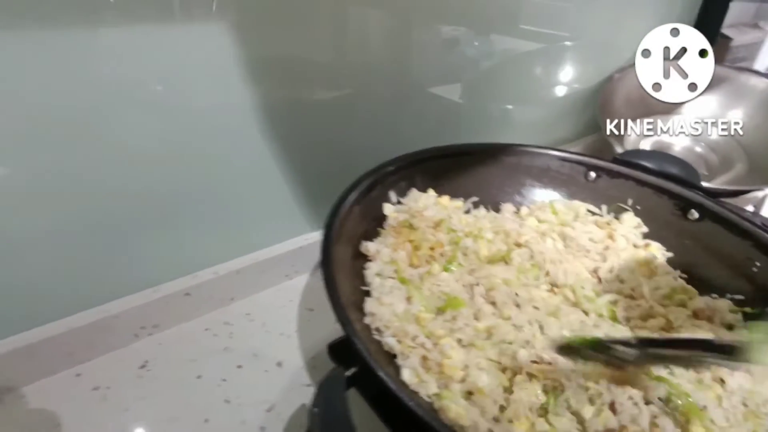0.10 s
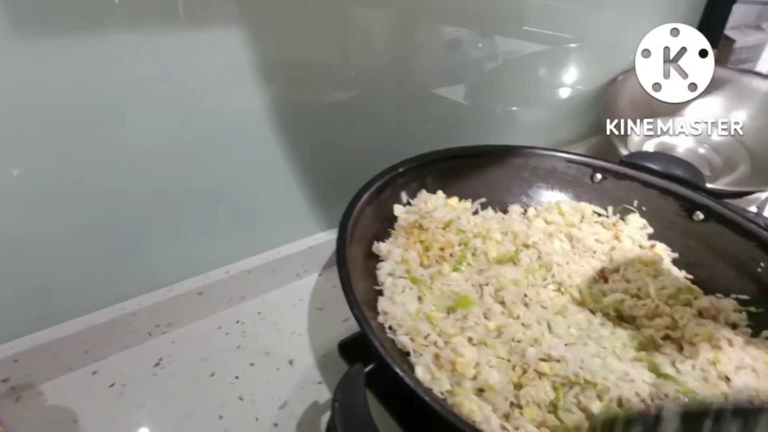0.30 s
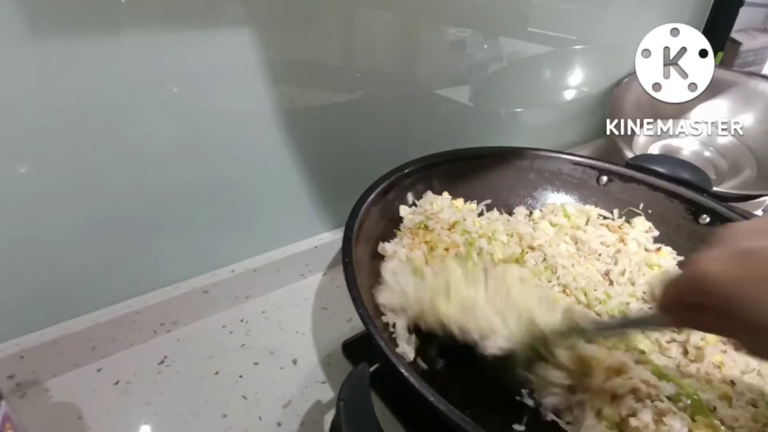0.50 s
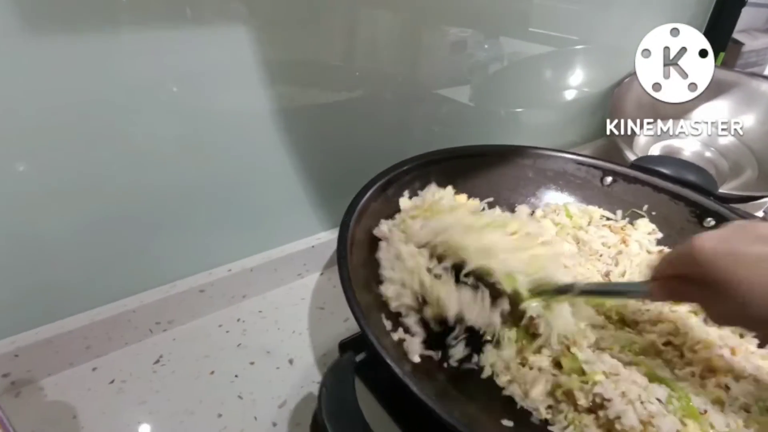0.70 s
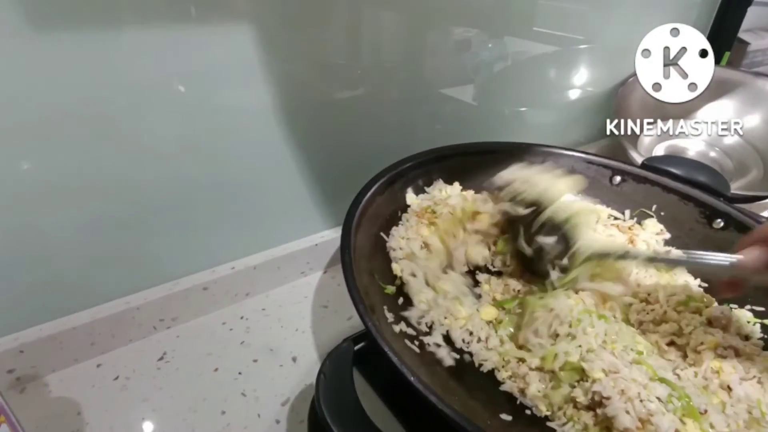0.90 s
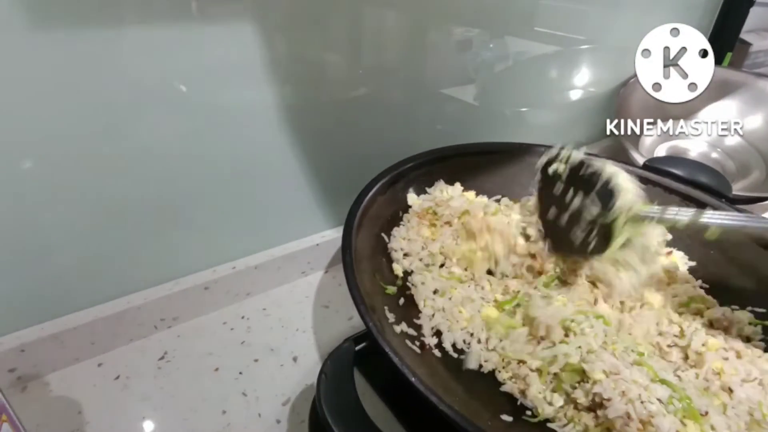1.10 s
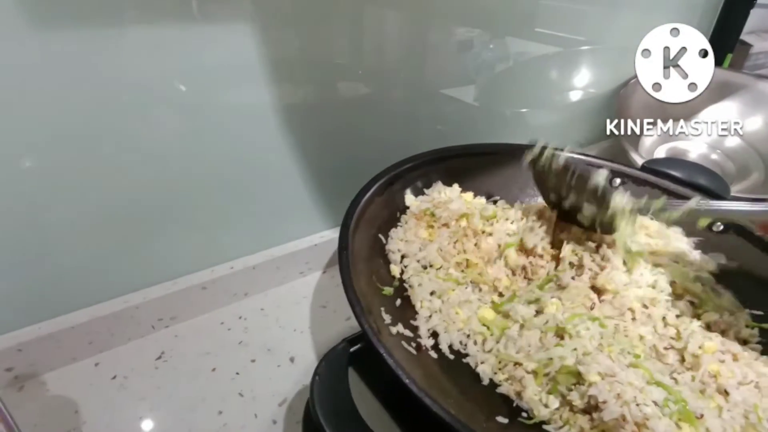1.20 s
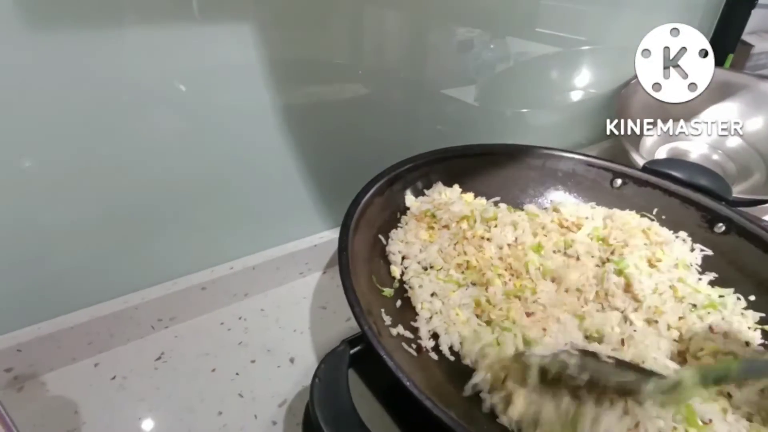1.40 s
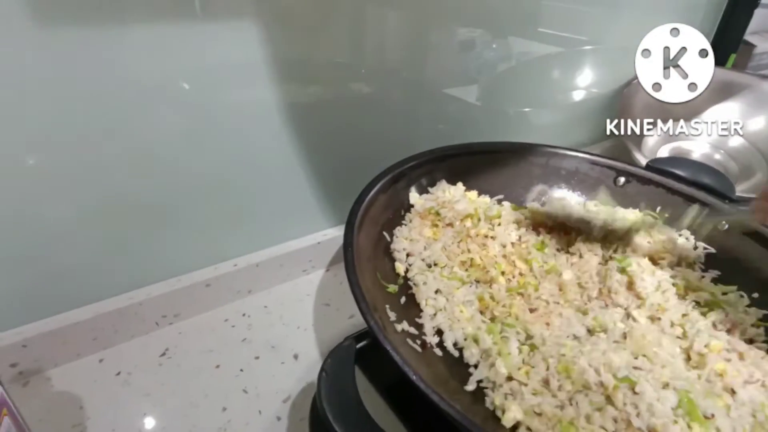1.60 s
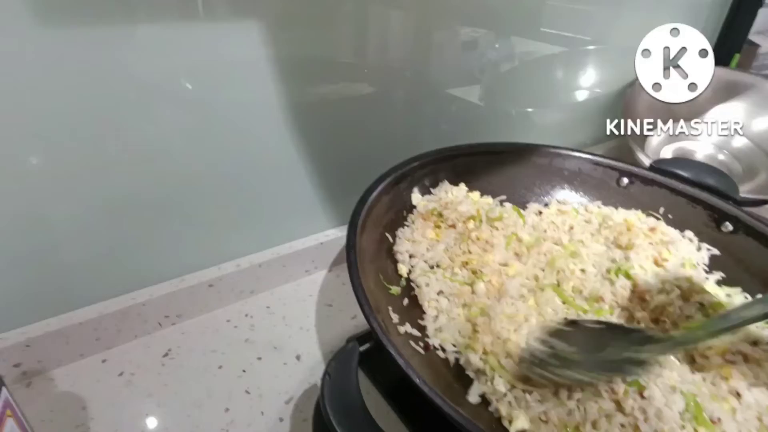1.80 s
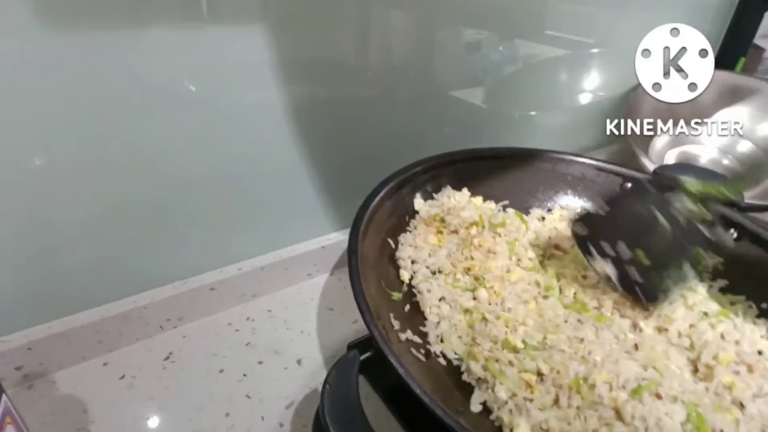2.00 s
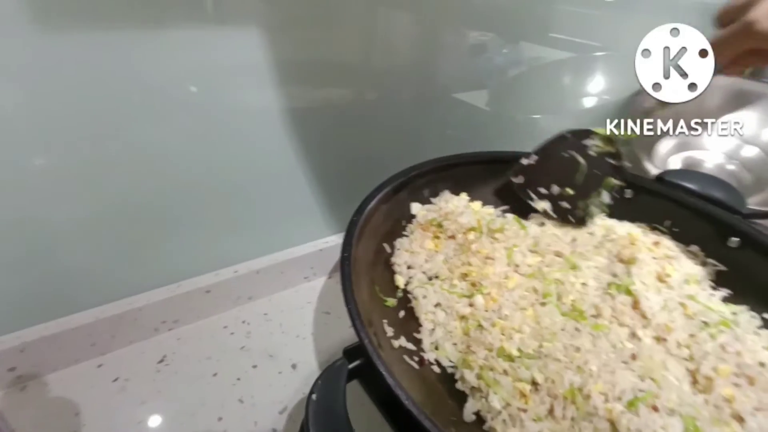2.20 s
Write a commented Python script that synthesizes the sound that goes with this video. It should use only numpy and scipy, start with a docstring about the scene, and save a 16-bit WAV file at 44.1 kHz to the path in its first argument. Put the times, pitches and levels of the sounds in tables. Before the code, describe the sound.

A metal spatula clacks hard against a wok, scrapes under rice, then knocks faintly again near the end

```python
"""A metal spatula strikes a wok: noise clacks, with damped modes of wok and blade.
The blade scrapes under the rice as random grains and groans in short gliding sines; lifted rice patters
back in showers of grains, the pan bumps on its support in low modes and the blade knocks again.
Shaped noise gives the stove's steady rumble, and dense grains a faint sizzle.
A small hard kitchen answers the knocks, scrape and bumps with decaying noise."""
import sys
import numpy as np
from scipy import signal
from scipy.fft import rfft, irfft
from scipy.io import wavfile
from scipy.ndimage import uniform_filter1d

SR = 44100
rng = np.random.default_rng(int(sys.argv[2]) if len(sys.argv) > 2 else 0)


def store_wav(level_fs):
    """Save 16-bit WAV to argv[1]."""
    pcm = np.round(np.clip(np.atleast_2d(level_fs), -1, 1) * 32767)
    wavfile.write(sys.argv[1], SR, pcm.T.astype(np.int16))


N = 97020
T = np.arange(N) / SR


def from_db(db):
    """Logarithmic level: decibels to amplitude gain."""
    return 10 ** (np.asarray(db) / 20)


def rms_one(x):
    """Normalisation: scale to an rms of 1."""
    return x / np.sqrt(np.mean(x ** 2) + 1e-20)


def at_hz(points, hz):
    """Interpolation along a logarithmic frequency axis."""
    table_hz, value = np.transpose(points)
    return np.interp(np.log(hz + 1), np.log(table_hz), value)


def coloured(x, spectrum):
    """Spectral shaping: weight each frequency of a steady sound, then set its rms to 1."""
    gain = from_db(at_hz(spectrum, np.fft.rfftfreq(N, 1 / SR)))
    return rms_one(irfft(rfft(x) * gain, N))


def dying(start, t60):
    """Exponential decay: silent until the start, then falling 60 dB in t60."""
    return (T >= start) * from_db(-60 * np.maximum(T - start, 0) / t60)


def ring(start, hz, t60):
    """Free vibration: one struck mode is a decaying sine."""
    return dying(start, t60) * np.sin(2 * np.pi * hz * (T - start))


UPPER_MODES_HZ = 990  # loss_db, in dB per octave, applies above this


def struck(start, modes, loss_db=0):
    """Modal superposition: a struck body sums its modes, whose levels vary from blow to blow."""
    out = np.zeros(N)
    for k, (hz, db, t60) in enumerate(modes):
        octaves_above = max(np.log2(hz / UPPER_MODES_HZ), 0)
        level_db = db + rng.normal(0, 1) - loss_db * octaves_above
        out += (-1) ** k * from_db(level_db) * ring(start, hz, t60)
    return out


def burst(start, spectrum, t60, attack_s):
    """High modal density: countless close modes dying together sound as decaying noise."""
    rise = np.clip((T - start) / attack_s, 0, 1)
    return rise * dying(start, t60) * coloured(rng.standard_normal(N), spectrum)


def grains(per_s, spread_db, spectrum):
    """Random impulse process: tiny contacts of uneven size and either sign; rms 1."""
    size = from_db(spread_db * np.minimum(rng.exponential(1, N), 4))
    sign = rng.choice([-1, 1], N)
    present = rng.random(N) < per_s / SR
    return coloured(size * sign * present, spectrum)


# spectrum of the stove's rumble: pitch_hz, level_db (per Hz)
STOVE_COLOUR = [(25, -5), (38, -6), (55, 2.5), (88, -5.5), (106, 9.5), (125, -2.5), (180, 2.5), (245, -4),
                (340, -0.5), (1050, -3), (1900, -13), (4000, -20), (8000, -36)]
STOVE_DB = -62.5


def stove():
    """Stationary noise: a steady rumble of fixed spectrum."""
    return from_db(STOVE_DB) * coloured(rng.standard_normal(N), STOVE_COLOUR)


# spectrum of the sizzling rice: pitch_hz, level_db
SIZZLE_COLOUR = [(800, -4.5), (2000, -5), (3900, -3.5), (4650, 3), (5500, -5), (7400, -3.5), (8200, -19.5)]
SIZZLE_DB, SIZZLE_GRAINS_PER_S, SIZZLE_SPREAD_DB = -71, 4400, 3


def sizzle():
    """Stationary impulse process: dense grains at a constant mean rate make a faint sizzle."""
    return from_db(SIZZLE_DB) * grains(SIZZLE_GRAINS_PER_S, SIZZLE_SPREAD_DB, SIZZLE_COLOUR)


# blade meets wok: start_s, clack_level_db, wok_level_db, blade_level_db,
# loss_db (per octave, of the wok's upper modes; negative strengthens them)
KNOCKS = [(0.2348, -36.5, -68.5, -58, 2), (0.2418, -28, -54, -63, 4), (0.2430, -18, -35.5, -28, 4),
          (0.2448, -20, -44, -32.5, -2.5), (2.0381, -54, -99, -65, 7), (2.1676, -46, -50.5, -36.5, 32),
          (2.184, -40.5, -58.5, -40, -2)]
# spectrum of the dense, short crash of a contact: pitch_hz, level_db (per Hz)
CLACK_COLOUR = [(60, -28), (270, -16), (380, -4.5), (600, 0), (720, -3.5), (1000, 0.5), (1230, -3),
                (1450, -1), (2400, -7.5), (3100, -5.5), (3650, -1.5), (4100, -6), (4900, -6.5),
                (5400, -14.5), (7000, -15.5), (8200, -39.5)]
CLACK_ATTACK_S, CLACK_T60_S = 0.00035, 0.038


def clacks():
    """Broadband impact: each contact between blade and pan is a short crash."""
    return sum(from_db(clack_db) * burst(s, CLACK_COLOUR, CLACK_T60_S, CLACK_ATTACK_S)
               for s, clack_db, *_ in KNOCKS)


# modes of the wok, damped by the rice and the blade: pitch_hz, level_db, t60_s
WOK_MODES = [(100.4, -15.5, 0.34), (187.7, -9.5, 0.23), (327.2, -8, 0.37), (445.4, -11, 0.27),
             (588.5, 1.5, 0.17), (787, -1.5, .15), (859, -1.5, 0.14), (916, 2.5, 0.18), (980, 2.5, 0.13),
             (1064, -2.5, .18), (1310, -8.5, 0.11), (1412, -0.5, 0.3), (1840, -3, .16), (1944, -2.5, .18),
             (3280, -33.5, 0.51), (3564, 2, 0.18)]
# modes of the spatula blade: pitch_hz, level_db, t60_s
BLADE_MODES = [(2980, -10.5, 0.032), (4300, -9.5, 0.091), (4646, 1, 0.023), (4990, -11.5, 0.043),
               (5740, -8, 0.018), (6540, -16.5, 0.054), (7570, -20.5, 0.079)]


def rings():
    """Modal excitation: knocks ring wok and blade; rice under the blade alters the wok's upper modes."""
    out = np.zeros(N)
    for s, _, wok_db, blade_db, loss_db in KNOCKS:
        out += from_db(wok_db) * struck(s, WOK_MODES, loss_db)
        out += from_db(blade_db) * struck(s, BLADE_MODES)
    return out


# decay time of the kitchen: pitch_hz, t60_s
ROOM_T60 = [(100, 1.43), (500, 0.9), (1500, .5), (4000, .5), (8000, 0.67)]
# colour of the kitchen: pitch_hz, level_db
ROOM_COLOUR = [(60, 1.5), (400, 1.5), (1000, 1), (2000, -1.5), (4000, -4), (8000, -4.5)]
ROOM_DB, ROOM_DELAY_S = -4.5, 0.0045
EARLY_DB, EARLY_T60_S = -4, 0.24


def kitchen(x):
    """Reverberation: quick reflections off wall and counter, then a tail dying band by band."""
    response = np.zeros(N)
    early = from_db(EARLY_DB) * rms_one(dying(ROOM_DELAY_S, EARLY_T60_S))
    edges_hz = np.geomspace(40, 10000, 9)
    for low, high in zip(edges_hz, edges_hz[1:]):
        hz = np.sqrt(low * high)
        band_filter = signal.butter(2, [low, high], "band", fs=SR, output="sos")
        band = signal.sosfilt(band_filter, rng.standard_normal(N))
        late = from_db(ROOM_DB) * rms_one(dying(ROOM_DELAY_S, at_hz(ROOM_T60, hz)))
        # the two decays add in power
        response += from_db(at_hz(ROOM_COLOUR, hz)) * band * np.hypot(late, early)
    return signal.fftconvolve(x, response / np.sqrt(N))[:N]


# level of the blade sliding under the rice: time_s, level_db
SCRAPE_LEVEL = [(.245, -57), (.262, -42.5), (.30, -42.5), (.325, -45.5), (.342, -43), (.362, -49.5),
                (.395, -43), (.432, -51), (.455, -59.5), (.54, -67), (.68, -82)]
# spectrum of the scrape: pitch_hz, level_db (per Hz)
SCRAPE_COLOUR = [(80, -9), (300, -6.5), (600, -10.5), (1050, -5.5), (1400, -4.5), (1700, -9), (2850, -11.5),
                 (3150, -3), (3550, -2), (4100, -9), (4400, 0.5), (4750, -2), (5400, -11.5), (7200, -14),
                 (8200, -30.5)]
SCRAPE_GRAINS_PER_S, SCRAPE_SPREAD_DB = 3000, 2


def scrape():
    """Sliding friction: the blade's edge catches on the pan thousands of times a second."""
    level_db = np.interp(T, *np.transpose(SCRAPE_LEVEL), left=-np.inf, right=-np.inf)
    return from_db(level_db) * grains(SCRAPE_GRAINS_PER_S, SCRAPE_SPREAD_DB, SCRAPE_COLOUR)


# the wok bumps on its support: start_s, thud_level_db, boom_level_db
BUMPS = [(.272, -41.5, -50), (0.659, -83, -59), (2.0064, -41.5, -55.5), (2.1935, -39, -74)]
# modes of the support: pitch_hz, level_db, t60_s
THUD_MODES = [(62, -20, .15), (192.5, -10, 0.13), (378, -3, 0.031), (710, 1, .014)]
BOOM_HZ, BOOM_T60_S = 106.6, 0.56  # the whole pan rocking on its support


def bumps():
    """Damped resonance: a dull thud of the support, and the whole pan booms on it."""
    out = np.zeros(N)
    for s, thud_db, boom_db in BUMPS:
        out += from_db(thud_db) * struck(s, THUD_MODES)
        out += from_db(boom_db) * ring(s, BOOM_HZ, BOOM_T60_S)
    return out


# short slips as the blade slows: middle_s, length_s, pitch_hz (at the middle), glide_hz_per_s, level_db
GROANS = [(0.416, 0.048, 628, 1302.5, -50), (0.45, 0.065, 762, -500, -53),
          (0.532, 0.074, 743, -1000, -53.5), (0.589, 0.042, 690, 399.5, -52.5), (0.636, 0.051, 727, 0, -61)]
GROAN_WAVER = 0.0205  # rms, as a fraction of the pitch


def groan():
    """Stick-slip oscillation: brief unsteady tones at the end of the stroke."""
    waver = 1 + GROAN_WAVER * rms_one(uniform_filter1d(rng.standard_normal(N), size=200))
    out = np.zeros(N)
    for middle, length, hz, glide, db in GROANS:
        swell = np.cos(np.pi * np.clip((T - middle) / length, -.5, .5)) ** 2
        pitch_hz = (hz + glide * (T - middle)) * waver
        out += from_db(db) * swell * np.sin(2 * np.pi * np.cumsum(pitch_hz) / SR)
    return out


# lifted rice drops into the pan: middle_s, spread_s, level_db
RICE_FALLS = [(1.098, 0.056, -58.5), (1.28, 0.061, -71.5), (1.426, 0.0038, -60.5), (1.582, 0.06, -59.5),
              (1.704, 0.019, -66)]
# spectrum of the pattering rice: pitch_hz, level_db
RICE_COLOUR = [(100, 2.5), (400, -7), (1050, 1.5), (1550, 0.5), (2200, -6), (3800, -6.5), (4650, -3),
               (5500, -10), (7300, -11), (8200, -24)]
RICE_GRAINS_PER_S, RICE_SPREAD_DB = 1600, 2


def rice():
    """Modulated impulse process: showers of grains swell and fade in level."""
    flow = sum(from_db(db) * np.exp(-.5 * ((T - middle) / spread) ** 2)
               for middle, spread, db in RICE_FALLS)
    return flow * grains(RICE_GRAINS_PER_S, RICE_SPREAD_DB, RICE_COLOUR)


BODY_ROOM_DB = -6  # room level of rings and bumps, relative to that of clack and scrape


def scene():
    """Linear superposition: spatula and wok in the room, over rice and stove."""
    contact = clacks() + scrape()
    body = rings() + bumps()
    room = kitchen(contact + from_db(BODY_ROOM_DB) * body)
    return (contact + body + room + groan() + rice() + sizzle() + stove())[None]


CUTOFF_HZ = 8700  # the filter is 54 dB down from here up


def record(dry):
    """Low-pass filtering: the top is cut steeply."""
    return signal.sosfilt(signal.cheby2(18, 54, CUTOFF_HZ, fs=SR, output="sos"), dry)


dry = scene()
out = record(dry)
store_wav(out)
```